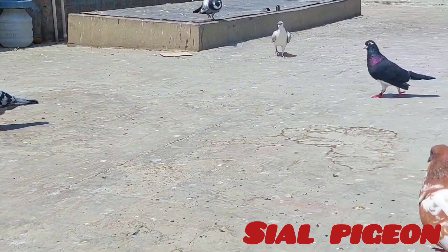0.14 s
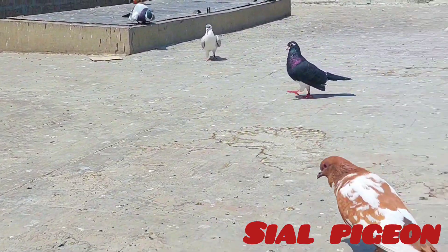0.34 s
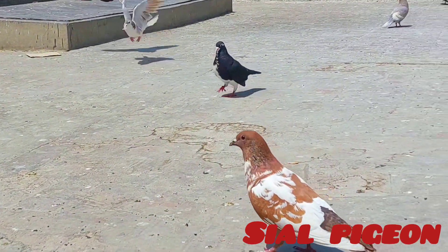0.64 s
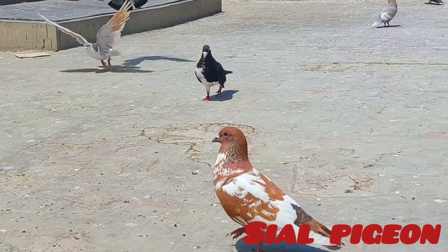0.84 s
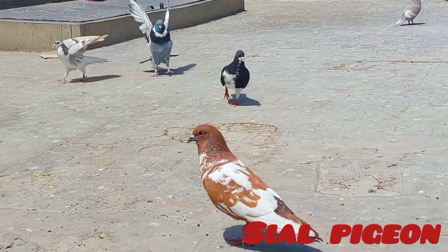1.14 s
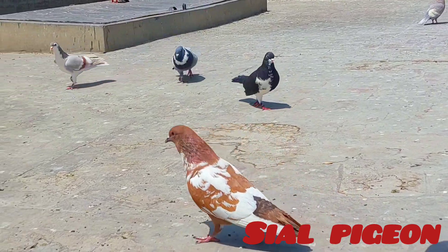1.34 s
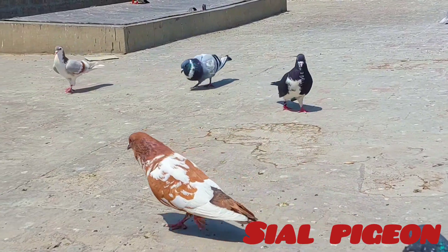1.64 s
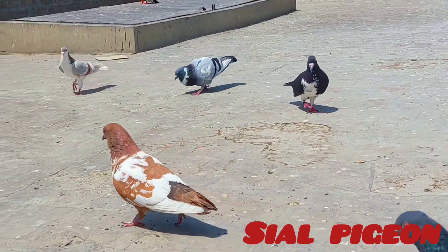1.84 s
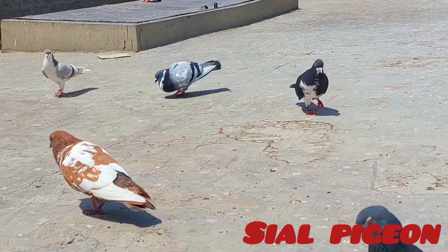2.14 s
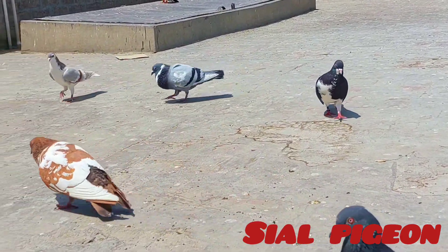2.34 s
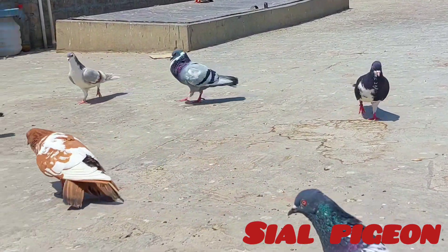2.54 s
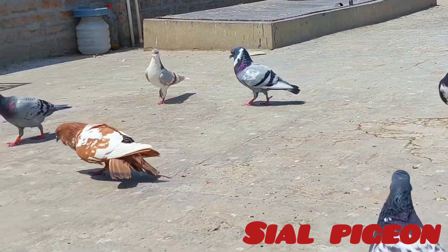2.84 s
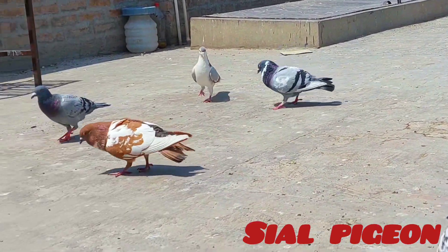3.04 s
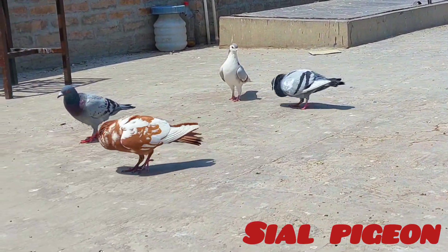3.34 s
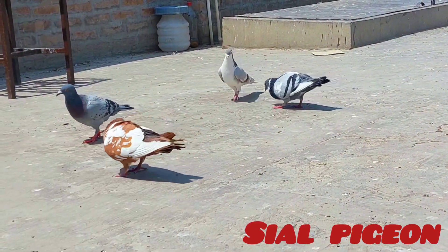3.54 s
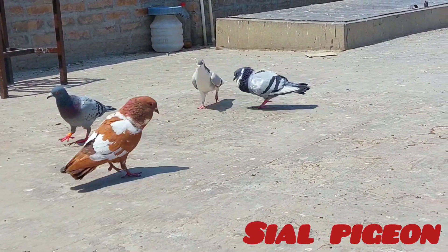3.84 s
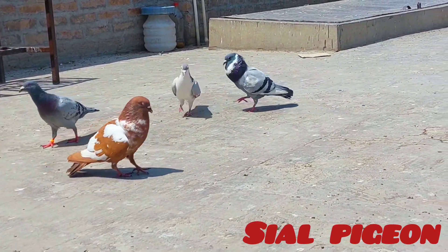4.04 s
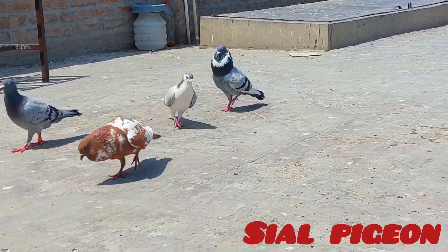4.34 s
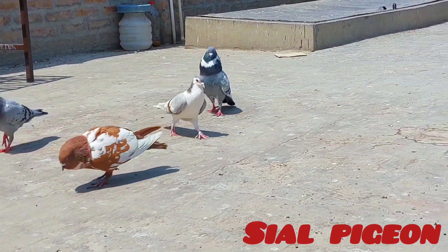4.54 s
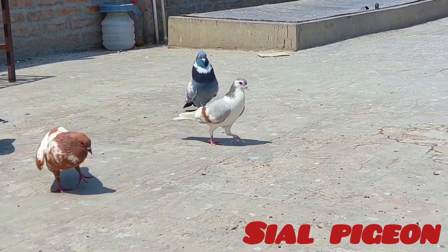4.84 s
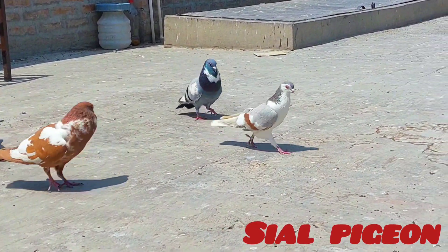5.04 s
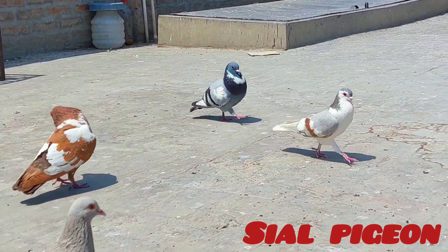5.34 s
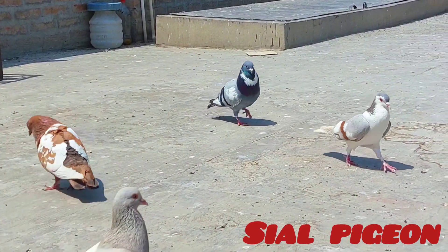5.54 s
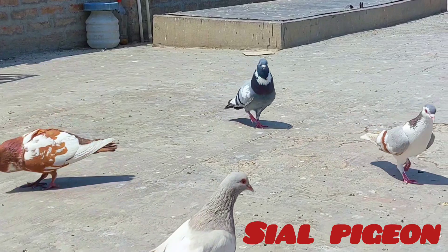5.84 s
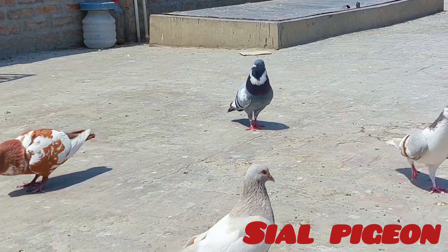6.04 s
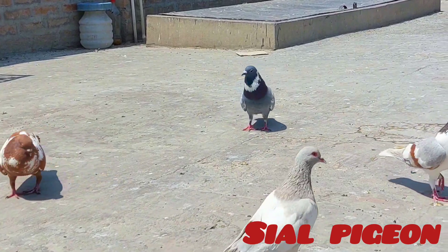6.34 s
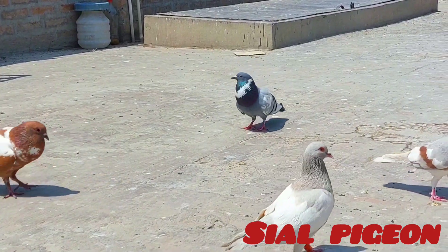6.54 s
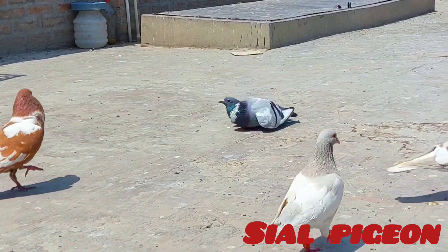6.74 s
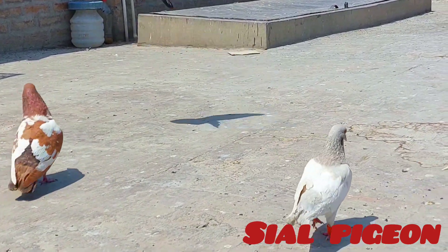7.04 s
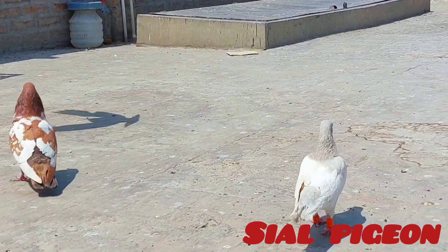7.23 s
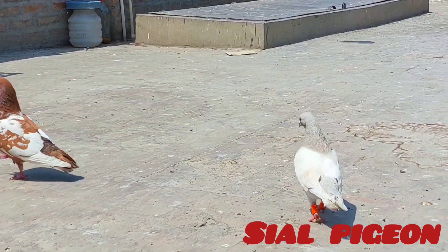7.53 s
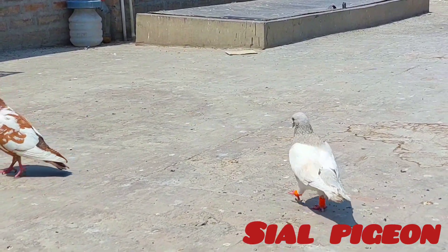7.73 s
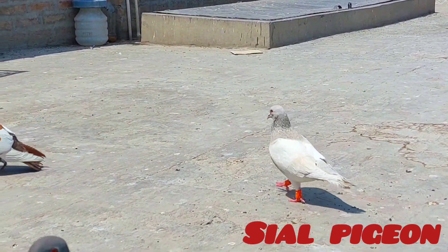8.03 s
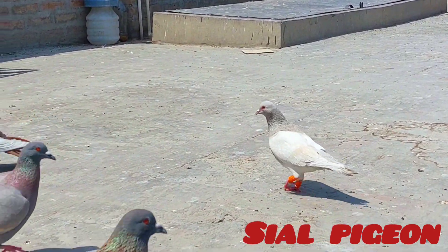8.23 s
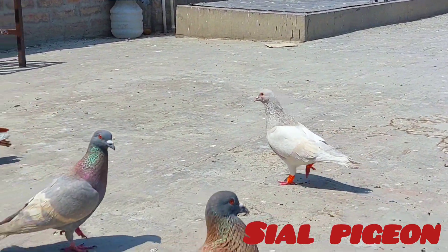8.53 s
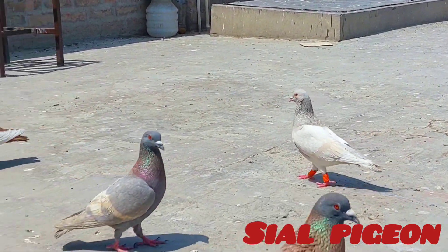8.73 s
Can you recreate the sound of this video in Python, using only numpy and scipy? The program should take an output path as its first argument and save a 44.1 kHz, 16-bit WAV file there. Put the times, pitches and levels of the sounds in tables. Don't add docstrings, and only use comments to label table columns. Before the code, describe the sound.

Many pigeons coo without pause on a concrete roof, low rolling throbs close by over a blur of birds further away. Early wing flaps and feather rustles come and go with tiny claw ticks. Past the middle a takeoff brings quickening dry claps, two of them loud, then the cooing carries on. Faint town rumble and a short wall echo surround a close stereo phone microphone.

```python
import sys
import numpy as np
from scipy import signal
from scipy.fft import rfft, irfft, next_fast_len
from scipy.io import wavfile
from scipy.ndimage import uniform_filter1d

SR = 44100
rng = np.random.default_rng(int(sys.argv[2]) if len(sys.argv) > 2 else 0)


def gain_from_db(level_db):
    decades = np.asarray(level_db, float) / 20
    return 10 ** decades


def dump(signal):
    limited = np.clip(np.atleast_2d(signal).T, -1, 1)
    pcm = np.round(limited * 32767).astype(np.int16)
    wavfile.write(sys.argv[1], SR, pcm)


N = 391608
T = np.arange(N) / SR
LEFT_RIGHT = np.array([[1], [-1]])
WAVER = []

# (frequency [Hz], density [dB per Hz])
HISS_COLOUR = [(2500, -29.5), (5000, -10), (8500, -10.5), (11500, 0.5), (15800, -2)]
# (frequency [Hz], left minus right [dB])
PORT_COLOUR = [(60, -1.5), (200, -3.5), (380, -1), (1290, -3.5), (2380, -12.5), (4400, -5.5), (8120, 3),
               (15000, 4)]
# (frequency [Hz], density [dB per Hz])
RUMBLE_COLOUR = [(25, -24.5), (45, -20.5), (80, -11), (120, -2.5), (148, 3), (170, -11.5), (200, -19),
                 (300, -56.5)]
# (frequency [Hz], width [Hz], level [dB])
HUM_MODES = [(51.3, 8, 0)]
# (time [s], level [dB])
RUMBLE_GUSTS = [
    (0.0, -52),
    (1.16, -48.5),
    (1.3, -55.5),
    (1.78, -40.5),
    (2.15, -51.5),
    (7.7, -50),
    (8.88, -49),
]
# (frequency [Hz], density [dB per Hz])
MURMUR_COLOUR = [(110, -49.5), (180, -20.5), (261, -4), (405, -7.5), (548, -15), (765, -30.5),
                 (1100, -49.5), (2420, -120)]
# (start [s], full [s], end [s], level [dB])
SHEET_DRAGS = [
    (1.3, 1.464, 1.788, -48),
    (5.8, 5.953, 6.4, -54.5),
]
# (frequency [Hz], width [Hz], level [dB])
SHEET_MODES = [(990, 250, -5), (1307, 40, 4), (1150, 40, -2), (1660, 200, -3.5), (2015, 110, -1.5),
               (2200, 75, -11), (1450, 840, -5.5), (2550, 230, -16.5), (730, 230, 0.5)]
# (time [s], peak [dB], lean [dB]; left minus right is the lean less 4.5 dB)
CLAW_TICKS = [(1.1982, -51, 3), (1.2794, -44, 2.0), (1.4805, -51, 7.5), (1.9734, -52, 4.0),
              (2.0238, -44, 5.5), (2.1081, -50, 5.5), (2.5436, -38, 5), (2.5905, -40, 7),
              (2.7332, -41, 3.0), (3.6576, -40, -2), (4.5291, -48, 2.0), (4.5645, -45, 4),
              (5.5294, -49, 4.5), (8.214, -43, 4.5), (8.2207, -32, 4.5), (8.5874, -37, 6.5),
              (8.7809, -38, 8), (2.8564, -36, 4.5), (3.4027, -36, 7), (6.351, -35, 6.5), (7.79, -47, 4),
              (7.85, -48, 4), (8.71, -49, 4), (6.0182, -53, 5.5), (6.0337, -41, 5.5), (6.4991, -48, 2.5),
              (6.5984, -39, 3.5), (6.6518, -49, 5.5), (7.9588, -41, 3.0), (8.0062, -40, 5.0),
              (7.97, -45, 4), (8.3285, -51, 2.0)]
# (time [s], level [dB])
WING_PUFFS = [
    (2.15, -46),
    (2.28, -49),
    (3.16, -45),
    (3.27, -44.5),
    (6.959, -37.5),
    (7.18, -41),
    (7.46, -40.5),
    (8.28, -44.5),
    (8.55, -43.5),
    (8.7, -47.5),
]
# (time [s], length [s], pitch [Hz], width [Hz], level [dB])
SQUEAKS = [(2.879, 0.11, 2310, 250, -55), (2.88, .04, 4300, 400, -54), (3.012, .03, 2300, 500, -51),
           (3.06, .04, 2550, 200, -57), (3.105, .02, 2600, 500, -50), (3.136, .03, 1950, 200, -55),
           (3.158, .04, 990, 200, -47), (3.225, .03, 4400, 300, -50), (3.404, .035, 5000, 400, -52),
           (3.405, .035, 6500, 300, -58), (4.02, 0.1, 4600, 110, -56), (4.021, .07, 4860, 100, -58),
           (4.015, 0.079, 5320, 100, -57), (4.21, 0.05, 4400, 400, -61),
           (4.834, 0.13, 4880, 70, -63), (6.969, 0.057, 1940, 200, -46),
           (7.223, 0.026, 2300, 400, -44.5), (7.343, .02, 2350, 400, -48),
           (7.407, 0.021, 2170, 600, -31.5), (5.84, .05, 2100, 900, -53),
           (7.43, 0.05, 2180, 700, -51), (1.3, .14, 2030, 130, -62), (1.445, .12, 1650, 250, -53),
           (1.7, .14, 1500, 300, -54), (5.17, .25, 2150, 900, -59), (5.4, .25, 2050, 900, -57),
           (5.62, 0.25, 2100, 1200, -55), (1.47, .2, 2030, 120, -56), (1.53, .14, 1300, 80, -56),
           (1.93, 0.38, 1770, 400, -62), (2.199, .3, 1750, 900, -57), (2.375, .05, 1510, 200, -58),
           (4.025, .03, 6550, 300, -59), (4.225, .025, 3800, 250, -62), (6.2, .25, 1310, 50, -58)]
# (time [s], level [dB])
FIDGETING = [(0.0, -62), (0.34, -62), (0.76, -56), (1.26, -63), (1.66, -69), (2.0, -64.5), (2.84, -61),
             (3.07, -55), (3.29, -55.5), (3.6, -62), (3.95, -63.5), (4.3, -63), (5.04, -63), (5.51, -60),
             (6.11, -63), (6.87, -55), (7.25, -49), (7.59, -54.5), (8.14, -61), (8.88, -60.5)]
# (frequency [Hz], density [dB per Hz])
FEATHER_COLOUR = [(1650, -21), (2800, -9.5), (3850, -5.5), (6630, -8), (9310, -13), (12700, -6),
                  (14800, -10.5), (15800, -10)]
# (frequency [Hz], density [dB per Hz])
SWISH_COLOUR = [(500, -37.5), (800, 4.5), (1100, 0), (1600, -3.5), (2400, -3), (2800, -8), (3200, -23),
                (4200, -59.5)]
SLICE_EDGES = (3600, 5640, 7950, 11100)
# (frequency [Hz], width [Hz], level [dB])
CLAP_MODES = [(2220, 1100, 0)]
# (time [s], peak [dB], dull part [dB], ring-out [s])
WING_BEATS = [(0.528, -32.5, -4.5, 0.29), (0.606, -36, 1, 0.17), (0.73, -39, -5, .1),
              (0.9156, -42, -9, 0.37), (0.9587, -30.5, -4, 0.26), (0.978, -34.5, -10, 0.18),
              (2.855, -31.5, -25, 0.08), (2.8774, -31, -11.5, 0.2), (2.9876, -34, -6, 0.19),
              (3.105, -33, -14, 0.061), (3.2278, -29.5, -8, 0.1), (3.359, -39.5, -4, 0.14),
              (3.4024, -35.5, -28, 0.21), (3.496, -37, -5, 0.096), (4.484, -50, 3.5, 0.16),
              (4.6088, -33.5, -11, 0.26), (5.674, -46, -4, 0.05), (8.03, -44, 3, 0.18),
              (8.3996, -31.5, -5.5, 0.13)]
# (time [s], peak [dB], dull part [dB], left minus right [dB])
TAKEOFF_CLAPS = [(6.302, -32, -3.5, -2), (6.349, -40, -5, 12), (6.43, -32, -5.5, -3),
                 (6.559, -25.5, -8.5, 0.5), (6.6905, -29, -6, -2.5), (6.831, -27.5, -7.5, 1),
                 (7.046, -24, -12, 4), (7.1063, -30, -6, 2), (7.1605, -15, -9.5, 2.5), (7.231, -38, -6, -3),
                 (7.282, -23.5, -12, -13), (7.299, -40, -6, 3), (7.406, -12.5, -6.5, 1),
                 (7.5487, -25.5, -8.5, 1), (7.7017, -35.5, -4.5, 4)]
# (time [s], peak [dB], left minus right [dB])
FEATHER_FLICKS = [(0.3054, -53, 14), (2.15, -42.5, 10), (2.325, -39, 14), (3.6032, -50, 10),
                  (4.0184, -41, 19), (4.8824, -42, 7), (5.006, -42.5, 5), (4.36, -50, 5), (4.22, -48, 3),
                  (5.515, -47, 4), (5.74, -47, 3), (5.835, -42.5, 4), (8.49, -48, 3), (8.64, -46, 3),
                  (8.588, -41, 9), (8.7803, -51, 24)]
# (pitch [Hz], spread [share], throb depth [0-1], pitch tremor [share], usual level [dB],
# answer to the deep lead [dB per dB])
REGISTERS = [
    (225, .06, 0.8, 0.02618, -37, 0.95),
    (298, .055, 0.87, 0.01975, -28.5, -0.14),
    (383.9, .06, 0.75, 0.02493, -33, -0.26),
    (525, .07, 0.86, .036, -42.5, 0.17),
]
# (time [s], effort [dB], lead of the deep voices [dB])
FLOCK_EFFORT = [(0.0, -6.5, 4), (0.15, -1, -1), (1.24, -2, 3.5), (1.48, -0.5, 2), (1.73, 2, -4.5),
                (2.03, -4.5, -1), (2.4, 4.5, -2), (3.39, 1.5, -1), (3.63, 4, 8), (3.76, 3.5, -6.5),
                (4.53, 3.5, -1), (4.89, -0.5, -2.5), (5.86, -3.5, -1.4), (5.99, 6, 0.5), (6.83, 3.5, -6),
                (7.36, -9, 8.5), (7.69, -1.5, 4), (8.88, 3, -1)]
# (time [s], peak [dB], pitch [Hz])
HIGH_PEEPS = [(0.113, -35, 490), (0.234, -28, 519), (0.443, -26, 545), (0.843, -39, 643), (0.909, -37, 541),
              (1.339, -36, 487), (1.496, -38, 482), (1.725, -35, 525), (2.161, -33.5, 677),
              (2.381, -29, 610), (2.549, -34, 485), (2.669, -37, 486), (3.222, -29, 530), (3.514, -30, 482),
              (3.636, -24, 482), (3.884, -32, 528), (4.15, -33, 495), (4.262, -27, 482), (5.24, -39, 490),
              (5.315, -36.5, 619), (5.858, -37, 522), (6.009, -20, 539), (6.852, -33, 519),
              (6.937, -31, 503), (8.053, -36, 480), (8.228, -26.5, 552), (8.321, -28, 584),
              (8.713, -27, 490), (8.769, -29, 520)]
# (time [s], peak [dB], pitch [Hz], rise [s])
LONE_SWELLS = [(0.0, -28, 401, 0.019), (0.1, -33, 498, 0.023), (0.14, -29, 387, 0.023),
               (0.9, -41.5, 765, 0.02), (0.86, -36, 540, .04), (1.27, -31.5, 448, 0.021),
               (1.38, -38, 559, .03), (1.5, -28.5, 423.5, 0.022), (1.55, -30, 350, .03),
               (1.6, -37, 579, 0.028), (2.93, -30, 408.6, .03), (3.35, -46, 657, .04),
               (6.2, -33, 520, 0.022), (8.02, -45, 1030, 0.012), (8.29, -41, 898, 0.019),
               (0.36, -28, 399.4, .03), (3.2, -24.5, 390, .03), (4.55, -31, 481, .03), (8.5, -25, 377, .02),
               (8.35, -27, 370, .025), (3.0, -33, 205, .04), (8.7, -33, 602, 0.014),
               (8.77, -26, 405, 0.016)]
# (start [s], length [s], pitch [Hz], level [dB])
RISING_NOTES = [(0.0, 0.037, 218, -30), (0.963, 0.19, 287, -31), (1.115, .13, 294.6, -25),
                (1.147, 0.097, 248.8, -24.5), (1.179, 0.22, 218.8, -31.5), (1.699, 0.18, 225, -37),
                (1.958, 0.077, 278, -31), (2.424, 0.12, 331.6, -26), (2.429, 0.23, 289.2, -32),
                (2.936, 0.098, 286.3, -24.5), (3.208, 0.18, 319.8, -29.5), (3.488, 0.31, 305, -27),
                (3.825, 0.21, 341.3, -35.5), (3.977, 0.16, 334.7, -22.5), (4.161, 0.2, 335.2, -25.5),
                (4.642, 0.083, 343.7, -23.5), (5.216, .22, 288.9, -22.5), (5.531, 0.15, 239.7, -32.5),
                (6.624, .28, 296.5, -26), (7.191, .16, 372, -33), (8.264, 0.056, 304.3, -25.5),
                (8.399, 0.26, 352, -27), (8.754, 0.033, 430, -39)]
# (start [s], length [s], pitch [Hz], level [dB])
SINKING_NOTES = [(.43, 0.088, 533, -34.5), (0.466, 0.11, 405, -31.5), (0.778, 0.12, 302.3, -31.5),
                 (2.49, 0.19, 225, -36.5), (2.688, 0.27, 326, -27.5), (2.7, 0.12, 474, -32),
                 (3.327, 0.15, 295, -31), (3.519, 0.14, 235.8, -29), (3.627, 0.13, 430.4, -33.5),
                 (4.005, 0.23, 430.6, -31), (4.404, 0.24, 393.6, -27.5), (4.52, 0.066, 536.5, -32),
                 (4.521, 0.11, 323.3, -25.5), (4.717, 0.19, 298.7, -28.5), (5.118, 0.077, 309.4, -31),
                 (5.791, 0.081, 237.4, -32.5), (5.956, 0.16, 315.3, -33.5), (6.128, 0.14, 316.5, -31),
                 (6.551, 0.083, 331.3, -24), (6.996, 0.046, 312, -27.5), (7.145, 0.11, 241, -31.5),
                 (7.298, 0.33, 242, -40.5), (7.853, 0.097, 294, -30), (7.873, 0.072, 400, -32),
                 (8.0, 0.079, 486, -35.5), (8.229, 0.082, 209.5, -38), (8.462, 0.14, 264.5, -30),
                 (8.769, 0.051, 249.4, -31.5)]
# (start [s], length [s], pitch [Hz], level [dB])
HELD_NOTES = [(0.262, 0.12, 368, -29.5), (0.44, 0.08, 290.5, -26.5), (.453, 0.065, 459, -32.5),
              (1.66, 0.22, 293.5, -26), (1.676, 0.18, 396.5, -29.5), (2.32, .16, 406.3, -30),
              (2.49, 0.12, 468, -34), (2.989, 0.22, 342, -29), (3.814, 0.15, 271, -29),
              (4.332, 0.17, 521, -36.5), (4.552, .24, 398.4, -30.5), (5.062, 0.13, 640, -47),
              (5.621, 0.18, 381.5, -29), (5.947, 0.13, 390, -29), (5.95, 0.23, 262.7, -29),
              (6.097, 0.16, 391, -28), (6.114, 0.32, 345.2, -28), (7.939, .11, 295.7, -26.5)]
# (start [s], pitch [Hz], level [dB])
SHORT_GRUNTS = [(.264, 713, -46.5), (.591, 257.7, -32.5), (2.293, 342.2, -24), (2.652, 393.8, -26),
                (3.5, 358.6, -27.5), (3.6, 476, -33.5), (3.67, 202, -33.5), (4.03, 525, -38.5),
                (4.203, 300, -26), (4.298, 298, -33), (5.495, 451, -35), (5.53, 410, -33),
                (5.801, 304, -26.5), (5.99, 544, -36.5), (6.387, 426.7, -32.5), (6.46, 401.6, -31),
                (7.153, 660, -42.5), (7.631, 416, -33), (7.768, 387, -26), (7.87, 483.5, -34)]
# (time [s], peak [dB], pitch [Hz])
ROLLED_THROBS = [(0.976, -10.5, 290), (1.031, -9.5, 298), (1.08, -16, 296), (2.085, -16, 300),
                 (2.4, -18.5, 308), (2.435, -13, 389), (2.736, -13, 308), (3.599, -17, 315),
                 (4.065, -18.5, 357), (4.661, -15.5, 333), (5.005, -16.5, 354), (5.175, -13.5, 307),
                 (5.305, -13.5, 331), (5.975, -15.5, 253), (6.77, -17.5, 321), (6.874, -15, 350)]


def shape(x, table, scale=1):
    hz, db = np.transpose(table)
    size = next_fast_len(N + SR // 10)
    f = np.log(np.arange(size // 2 + 1) * SR / size + 1e-9)
    gain = gain_from_db(scale * np.interp(f, np.log(hz + 1e-9), db))
    return irfft(rfft(x, size) * gain, size)[..., :N]


def unit(x):
    return x / np.sqrt(np.mean(x ** 2))


def walk(rate):
    hold = int(SR / rate)
    steps = np.repeat(rng.standard_normal(N // hold + 1), hold)
    return unit(uniform_filter1d(uniform_filter1d(steps, hold), hold)[:N])


def noise(table, alike):
    middle, side = rng.standard_normal((2, N))
    alike = np.clip(alike, 0, 1)
    middle = middle * np.sqrt(1 + alike)
    side = side * np.sqrt(1 - alike)
    return unit(shape(np.array([middle + side, middle - side]), table))


def ringing(modes, alike):
    f = np.arange(20, SR // 2, 2.)
    power = sum(gain_from_db(2 * db) / (1 + (2 * (f - hz) / width) ** 2) ** 2 for hz, width, db in modes)
    return noise(np.transpose([f, 10 * np.log10(power)]), alike)


def place(x, side):
    lag = int(side * 22)
    return np.array([np.roll(x, max(lag, 0)), np.roll(x, max(-lag, 0))])


def hiss():
    return gain_from_db(-70.5) * noise(HISS_COLOUR, alike=0)


def town():
    s, db = np.transpose(RUMBLE_GUSTS)
    rumble = gain_from_db(-45.5) * noise(RUMBLE_COLOUR, alike=0.75) + gain_from_db(-52.5) * ringing(HUM_MODES, alike=.85)
    gust = gain_from_db(0.77 * (np.interp(T, s, db) - np.mean(db)))
    murmur = gain_from_db(-36 + 3.57 * walk(4.017)) * noise(MURMUR_COLOUR, alike=0.84)
    return gust * rumble + murmur


def scrapes():
    drag = sum(gain_from_db(db) * np.interp(T, [start, full, end, end + 0.16], [0, 1, 1, 0])
               for start, full, end, db in SHEET_DRAGS)
    stutter = gain_from_db(1.7 * walk(90) + 1.2 * walk(12))
    return drag * stutter * ringing(SHEET_MODES, alike=0.12)


def claws():
    faint_db = -65.5 + np.minimum(9.1 * rng.exponential(size=N), 9)
    hits = (rng.random(N) < 9 / SR) * gain_from_db(faint_db) * np.ones((2, 1))
    for t, db, pan_db in CLAW_TICKS:
        hits[:, int(t * SR)] += gain_from_db(db - 9 + LEFT_RIGHT[:, 0] * (pan_db - 4.5) / 2)
    tick = signal.lfilter([1], [1, -.994], hits)
    grit = noise([(3000, -16), (6000, -9), (12000, 3.5), (16000, -3.0)], alike=.1)
    sway = gain_from_db(.8 * walk(3.3) * LEFT_RIGHT)
    return sway * tick * grit


def puffs():
    body = sum(gain_from_db(db) * np.interp(T, [t, t + 0.017, t + 0.068], [0, 1, 0]) for t, db in WING_PUFFS)
    return body * ringing([(736, 310, 0)], alike=0.47)


def squeaks():
    out, air = np.zeros((2, N)), rng.standard_normal((2, SR))
    for t, length, hz, width, db in SQUEAKS:
        band = signal.butter(2, [hz - width / 2, hz + width / 2], "band", fs=SR, output="sos")
        age = np.arange(int(length * SR)) / SR
        stretch = int(t * SR / 10)
        whistle = unit(signal.sosfilt(band, air))[:, stretch:stretch + len(age)]
        start = int(t * SR)
        out[:, start:start + len(age)] += gain_from_db(db) * np.interp(age, [0, .006, length], [0, 1, 0]) * whistle
    return out


def patchy(x):
    lows = [0 * x]
    for hz in SLICE_EDGES:
        lows.append(signal.sosfilt(signal.butter(3, hz, fs=SR, output="sos"), x))
    lows.append(x)
    out = 0
    for k in range(len(lows) - 1):
        sway = WAVER[3][k * SR:][:N]
        out = out + gain_from_db(1.5 * sway) * (lows[k + 1] - lows[k])
    return unit(out)


def wings():
    bright = patchy(noise(FEATHER_COLOUR, alike=0.06))
    dull = noise(SWISH_COLOUR, alike=0.015)
    fidget_db = np.interp(T, *np.transpose(FIDGETING))
    high = gain_from_db(fidget_db + .9 * walk(18)) * np.ones((2, 1))
    low = gain_from_db(fidget_db - 0.15 + 1.5 * walk(22)) * np.ones((2, 1))
    hollow = np.zeros((2, N))
    soft_s, sharp_s = 0.0023, 0.00079
    claps = [(t, db, dull_db, ring, 1, soft_s) for t, db, dull_db, ring in WING_BEATS]
    claps += [(t, db, dull_db, 0.069, pan, sharp_s) for t, db, dull_db, pan in TAKEOFF_CLAPS]
    claps += [(t, db, -25.5, 0.14, pan, sharp_s) for t, db, pan in FEATHER_FLICKS]
    age = np.arange(SR // 3) / SR
    for t, db, dull_db, ring, pan_db, attack in claps:
        i = int(t * SR)
        snap = np.exp(-age / 0.003) + np.exp(-np.log(1000) * age / max(ring, .01))
        hit = gain_from_db(db - 15.0 + LEFT_RIGHT * pan_db / 2) * snap * np.minimum(age / attack, 1)
        hit = hit[:, :N - i]
        high[:, i:i + len(age)] += hit
        low[:, i:i + len(age)] += gain_from_db(dull_db + 3) * hit
        hollow[:, i:i + len(age)] += gain_from_db(dull_db + 2.5) * hit
    flutter = walk(45)
    feathers = high * gain_from_db(.9 * flutter + 1.55 * walk(150)) * bright
    swish = low * gain_from_db(1.2 * flutter + 2.28 * walk(80)) * dull
    return hollow * ringing(CLAP_MODES, alike=0.09) + feathers + swish


def coo(hz, rate, depth, tremor, second_db=-32):
    at = rng.integers(0, N, 5)
    drift, roll, shake, flick = (w[a:a + len(hz)] for w, a in zip(WAVER, at))
    pump = np.cos(2 * np.pi * np.cumsum(rate * np.exp(.25 * drift)) / SR + at[4])
    rolled = np.clip(depth + 0.45 * roll, 0, 1)
    phase = 2 * np.pi * np.cumsum(hz * (1 + tremor * (1.45 * rolled * pump + shake))) / SR
    swell = (1 + rolled * pump) ** 1.18 * gain_from_db(1.04 * flick)
    return unit(swell * (np.sin(phase) + gain_from_db(second_db) * np.sin(2 * phase)))


def far_birds():
    s, effort_db, lead_db = np.transpose(FLOCK_EFFORT)
    out = 0
    for hz, spread, depth, tremor, db, answer in REGISTERS:
        group = 0
        for step in np.linspace(-1, 1, num=5):
            pitch = hz * np.exp(spread * (1.5 * step + np.tanh(walk(5))))
            notes = np.clip(0.71 + 0.58 * walk(7), 0, 1.3)
            side = rng.uniform(-1.01, 1) * hz / 300
            group = group + place(notes * coo(pitch, 30, depth, tremor), side)
        out = out + unit(group) * gain_from_db(db - 2.5 + np.interp(T, s, effort_db + answer * lead_db))
    return out


def peeps():
    out = np.zeros((2, N + SR))
    swells = [(*peep, .008) for peep in HIGH_PEEPS] + LONE_SWELLS
    for k, (t, db, hz, rise) in enumerate(swells):
        age = np.arange(int(7 * rise * SR)) / SR
        throb = (age / rise) ** 2 * np.exp(2 - 2 * age / rise) * np.sin(2 * np.pi * hz * age)
        out[:, int(t * SR):][:, :len(age)] += gain_from_db(db - 1) * place(throb, 0.69 * (-1) ** k)
    return out[:, :N]


def near_birds():
    out = np.zeros((2, N + SR))
    notes = [(*n, 0.528) for n in RISING_NOTES]
    notes += [(*n, -0.547) for n in SINKING_NOTES]
    notes += [(*n, 0) for n in HELD_NOTES]
    notes += [(t, .068, hz, db, 0) for t, hz, db in SHORT_GRUNTS]
    sides = rng.uniform(-0.88, 1, len(notes))
    for (t, length, hz, db, bend), side in zip(notes, sides):
        u = np.linspace(0, 1, int((length + .04) * SR))
        pitch = hz * (1 + bend * length * u)
        tremor = 0.014 + 0.015 * (hz > 620)
        note = np.sin(np.pi * u) ** 0.51 * coo(pitch, 27.4, 0.48, tremor)
        i = int(max(t - .02, 0) * SR)
        out[:, i:i + len(u)] += gain_from_db(db) * place(note, side)
    age = np.arange(int(0.058 * SR)) / SR
    swell = (age / 0.0094) ** 2 * np.exp(2 - 2 * age / 0.0075)
    for t, db, hz in ROLLED_THROBS:
        i = int(t * SR)
        out[:, i:i + len(age)] += gain_from_db(db + 1.5) * swell * np.sin(2 * np.pi * hz * age)
    return out[:, :N]


def walls(x, t60=0.3, wet_db=-12):
    age = np.arange(SR // 2) / SR
    tail = rng.standard_normal((2, len(age))) * np.exp(-np.log(1000) * age / t60) * (age > .008)
    tail = tail / np.sqrt(np.sum(tail ** 2, axis=1, keepdims=True))
    return x + gain_from_db(wet_db) * signal.fftconvolve(x, tail, axes=1)[:, :N]


def scene():
    WAVER[:] = [np.append(w, w[::-1]) for w in map(walk, (4, 3, 40, 25))]
    flock = far_birds() + peeps() + near_birds()
    movement = scrapes() + claws() + puffs() + squeaks() + wings()
    return hiss() + town() + walls(movement + flock)


def band_limit(x):
    return signal.sosfilt(signal.butter(12, 16480, fs=SR, output="sos"), x)


def record(dry):
    ports = np.array([shape(dry[0], PORT_COLOUR, 0.39), shape(dry[1], PORT_COLOUR, -0.53)])
    ports = signal.sosfilt(signal.ellip(10, .2, 80, 15500, fs=SR, output="sos"), ports)
    ports = ports * np.clip((T[-1] - T) / .006, 0, 1)
    return band_limit(ports)


dry = scene()
out = record(dry)
dump(out)
```